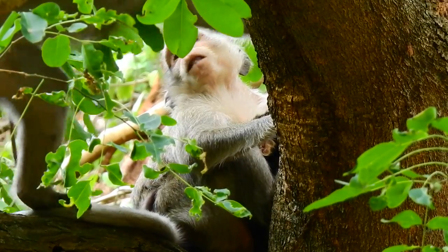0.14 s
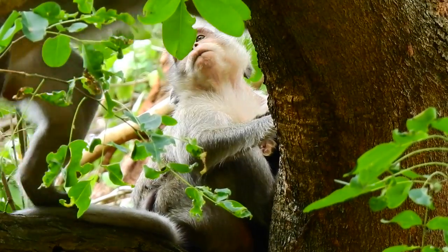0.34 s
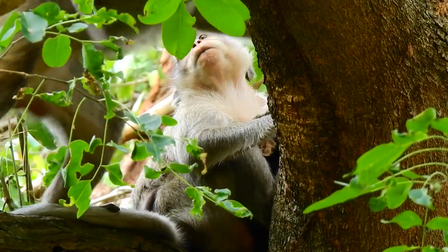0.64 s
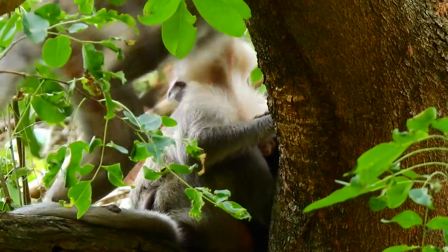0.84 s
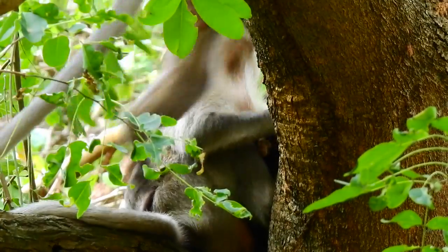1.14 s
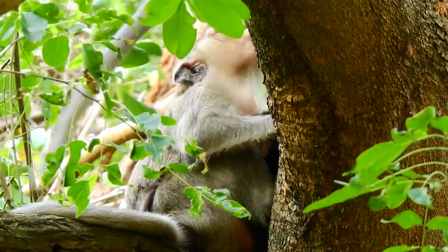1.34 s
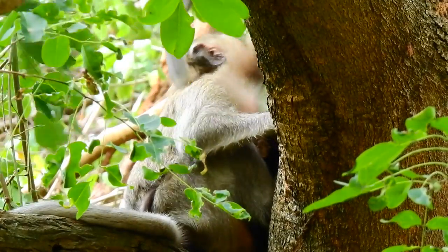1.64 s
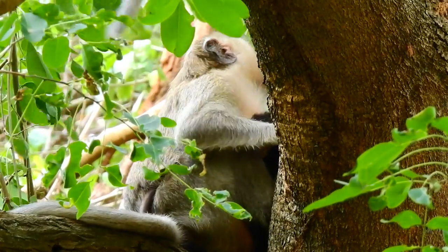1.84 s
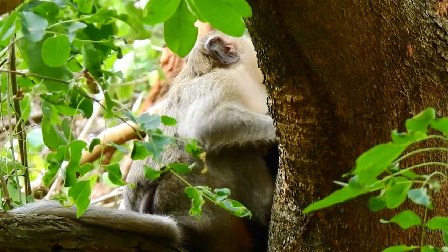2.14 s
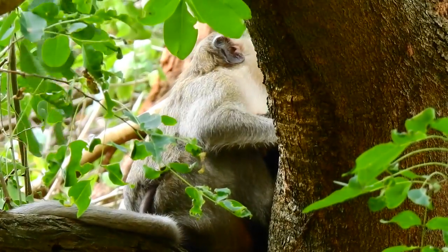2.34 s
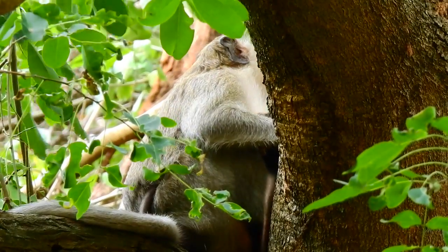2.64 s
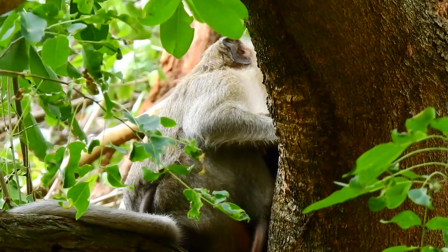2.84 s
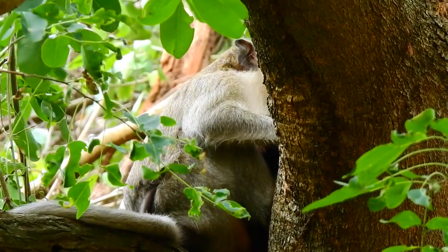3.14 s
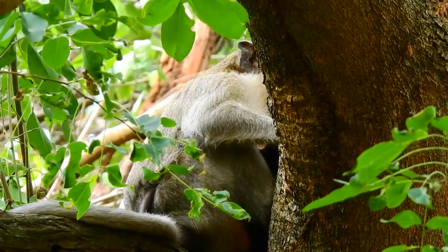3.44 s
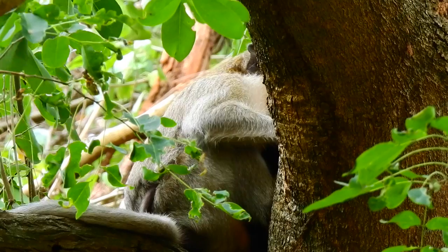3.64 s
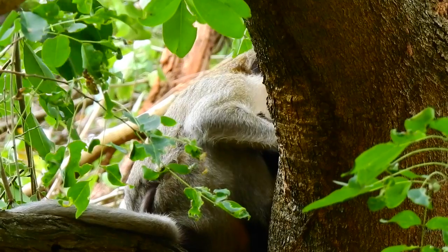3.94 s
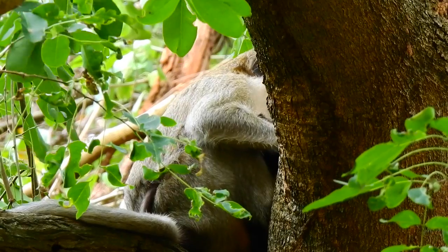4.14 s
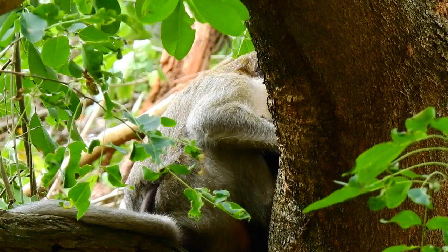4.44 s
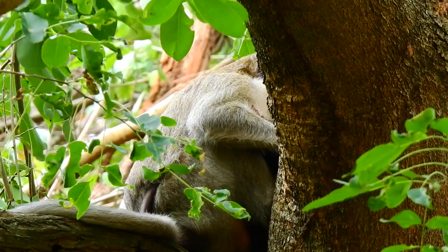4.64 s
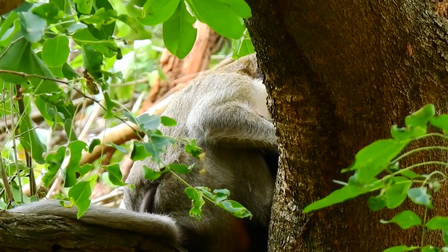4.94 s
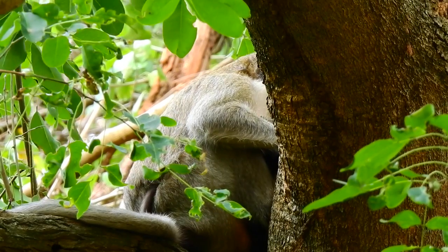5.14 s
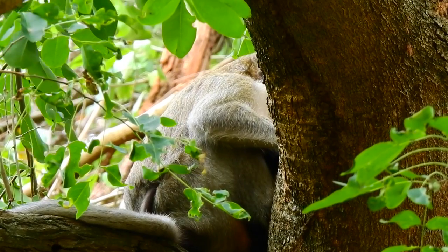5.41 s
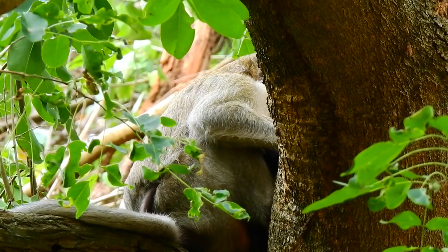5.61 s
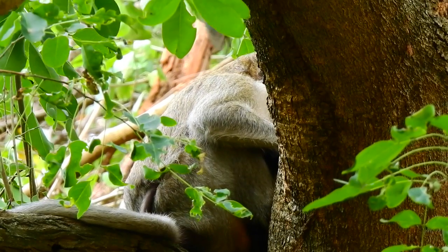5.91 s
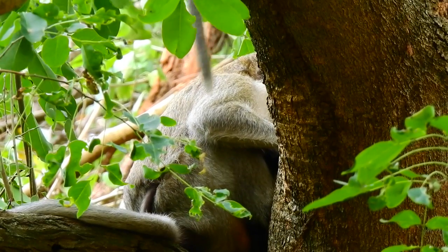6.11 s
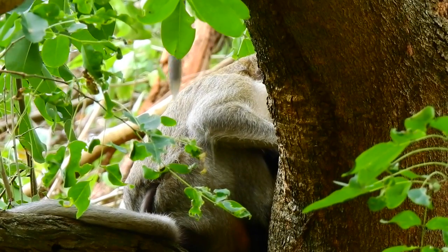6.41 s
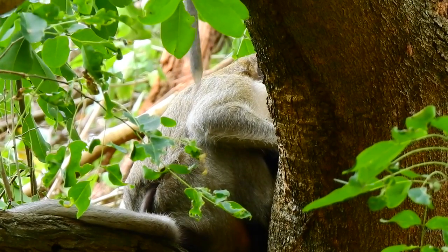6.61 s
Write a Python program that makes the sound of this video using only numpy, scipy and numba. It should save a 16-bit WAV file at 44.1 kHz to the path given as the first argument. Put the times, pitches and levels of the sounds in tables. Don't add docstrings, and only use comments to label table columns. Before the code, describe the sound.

A tropical forest heard in stereo, close to the foliage. At 0 s a distant cicada group drones at high pitch, a rapid clicking blurred into a buzz around 5 to 7 kHz. From about 0.5 to 1.3 s a nearer, shriller group swells over it and holds, slightly wavering, until about 6.4 s, then fades quickly, leaving the far drone bare by 6.7 s. Underneath are soft low breeze, thin hiss and a very faint far engine idling. Leaves brush brightly near 0.9 s, flick at 1.8, swish at 3.4 to 3.6 and most strongly at 4.05 s. Dry twig ticks come at 0.3, 1.75, 2.65, 3.5, 4.3, 4.5 and 4.8 s. Distant birds give faint level calls early, a falling whistle at 1.1 s, short notes at 2.6 and 3.4 s, a lower gliding cluster around 4.6 to 5.1 s and weak notes near 6.6 s, lightly echoing off trunks.

```python
import sys
import numpy as np
from scipy import signal
from scipy.fft import rfft, irfft, next_fast_len
from scipy.io import wavfile
from scipy.ndimage import uniform_filter1d
from numba import njit

SR = 44100
rng = np.random.default_rng(int(sys.argv[2]) if len(sys.argv) > 2 else 0)


def to_wav(sig):
    pcm = np.clip(np.atleast_2d(sig), -1, 1) * 32767
    pcm = np.round(pcm).astype(np.int16)
    wavfile.write(sys.argv[1], SR, pcm.T)


def decibels_to_gain(level_db):
    exponent = np.asarray(level_db, float) / 20
    return 10 ** exponent


N = 298557
TIME = np.arange(N) / SR
SIZE = next_fast_len(N + SR)
FREQ = np.maximum(np.arange(SIZE // 2 + 1) * SR / SIZE, 1)

# f/Hz, level/dB [dB per Hz]
AIR_SPECTRUM = [(13, -72), (22, -45), (49, -7.5), (119, -1.5), (258, -19), (308, -18.5), (501, -20.5),
                (654, -16), (747, -23.5), (1040, -20), (1660, -23), (1940, -21), (2210, -23), (2580, -22),
                (4400, -18), (5720, -50), (9680, -120)]
# f/Hz, level/dB [dB per Hz]
HISS_SPECTRUM = [(8600, -11), (9300, -2.5), (10000, -3), (11000, -3.5), (13000, -9), (16600, -15)]
# t/s, level/dB
GUSTS = [(0, -59.5), (.66, -62.5), (1.1, -64), (2.13, -59), (2.9, -61.5), (3.8, -61.5), (4.45, -59),
         (4.9, -62.5), (5.5, -63.5), (6.45, -64.5), (6.77, -61.5)]
# t/s, f/Hz, level/dB
ENGINE_FIRING = [
    (0, 24.34, -10),
    (.6, 23.71, 0),
    (1.3, 23, -4),
    (2.2, 23, -2),
    (3, 22.41, 1),
    (4, 22.42, -2),
    (5, 22.5, 0.5),
    (6, 22.19, 1.5),
    (6.77, 21.52, 2.5),
]
# multiple of the firing rate [1], level/dB
EXHAUST_ORDERS = [(2, -26), (3, -3.5), (4, -5), (5, -2.5), (6, -2.5), (7, -7.5), (8, -15.5), (9, -15)]
# t/s, length/s, start f/Hz, end f/Hz, level/dB
BIRD_GLIDES = [(1.08, .098, 4750, 4100, -54), (1.17, .06, 4200, 4050, -59), (1.1, 0.06, 2300, 2314, -66.5),
               (2.59, .09, 3800, 3820, -55), (2.597, .08, 3350, 3330, -64), (3.221, 0.11, 3320, 3420, -63),
               (3.24, .06, 2500, 2340, -65), (3.399, 0.056, 2580, 2800, -55.5),
               (3.456, .07, 3250, 3206, -59.5), (3.531, 0.113, 3100, 3340, -57),
               (4.599, 0.087, 2170, 2335, -64), (4.614, .05, 1790, 1740, -65), (4.68, .04, 2300, 2160, -64),
               (4.72, .12, 2089, 2040, -54.5), (4.755, .085, 1910, 1430, -53),
               (4.79, .09, 1950, 1622, -58.5), (4.857, .06, 1500, 1370, -65), (4.921, .05, 1360, 1660, -61),
               (4.97, .03, 1850, 1850, -65), (5.078, 0.057, 2042, 2040, -62),
               (6.547, 0.17, 1957, 1950, -70), (6.733, .05, 2180, 2190, -64)]
# t/s, length/s, f/Hz, level/dB
BIRD_HOOTS = [(0, 0.6, 3390, -68), (.63, .3, 3390, -68), (0.819, .25, 3815, -58.5), (1.26, .16, 3815, -61),
              (1.2, .35, 3400, -72), (1.199, .3, 1080, -70), (1.72, .17, 324, -66),
              (2.15, 0.32, 169.4, -59.5), (2.95, .2, 1714, -71), (2.857, 0.047, 168, -48),
              (3.001, 0.46, 643.6, -68.5), (3.951, .5, 640, -73), (5.401, .157, 385.3, -67),
              (5.804, 0.37, 644, -69.5), (6.102, .62, 1056, -72)]
# t/s, peak level/dB, ring f/Hz, ring time/s
TWIG_TICKS = [(.321, -48, 2600, .02), (.677, -53, 497, .022), (1.737, -41, 4000, .015),
              (1.777, -43, 3750, .04), (1.785, -41, 4300, .04), (2.33, -53, 1206, .03),
              (2.648, -45, 440, .028), (2.652, -46, 3800, .02), (3.498, -42, 3500, .015),
              (3.871, -55, 300, .03), (4.008, -62, 10530, .01), (4.261, -44, 3210, 0.022),
              (4.483, -44, 3700, .015), (4.762, -42.5, 3670, .04), (5.4505, -60, 12500, .0062)]
# loudest t/s, length/s, level/dB, brightness/dB, lowest f/Hz (leaf size)
LEAF_BRUSHES = [
    (.92, 0.14, -61, -16, 2000),
    (1.777, 0.079, -57, -24, 2400),
    (3.36, .28, -61, -27, 1800),
    (3.573, 0.16, -55, -17, 1290),
    (4.045, .095, -49, -17.5, 450),
    (5.46, .05, -74, -2, 3500),
]
# t/s, far group level/dB, near group level/dB
CHORUS_LEVELS = [(0, -42, -62), (.5, -42.5, -59), (.8, -43.5, -53.5), (1.3, -45.5, -51), (2.1, -47, -49),
                 (4, -46.5, -50), (5, -49, -49.5), (6.2, -48.5, -50.5), (6.47, -47.5, -52),
                 (6.64, -44, -62), (6.77, -46, -65)]
# f/Hz, level/dB [dB per Hz]
FAR_RADIATION = [(3000, -38), (3800, -46), (4720, -15.5), (4920, -6), (5150, -3.5), (5690, -9.5), (6030, 1),
                 (6380, 1), (7260, -4.5), (7680, -7.5), (8100, -32), (8800, -32), (9600, -30.5),
                 (10500, -48)]
# f/Hz, level/dB [dB per Hz]
NEAR_RADIATION = [(3900, -36), (4730, -12.5), (5500, -14), (5750, -2), (6030, -1.5), (6600, -16),
                  (6940, -0.5), (7400, -1), (7800, -4.5), (8600, -10), (8780, -24.5), (9300, -23.5),
                  (9900, -28), (10600, -39)]
# f/Hz, level/dB
STEADY_PARTIALS = [(5190, -57), (5529, -59.5), (5879, -49), (6035, -61.5), (6072, -49.5), (6099, -52.5),
                   (6250, -53), (6379, -54.5), (6713, -60), (6848, -52), (6928, -49), (7084, -69),
                   (7144, -48.5), (7298, -51.5), (7424, -57), (7515, -75), (7854, -71), (7946, -74),
                   (8000, -60), (8177, -83), (8323, -68), (8479, -71)]


def unit(x):
    return x / np.sqrt(np.mean(x ** 2))


def curves(table):
    s, *columns = np.transpose(table)
    return [np.interp(TIME, s, column) for column in columns]


def colour(points):
    hz, db = np.transpose(points)
    return decibels_to_gain(np.interp(np.log(FREQ), np.log(hz), db, left=-200, right=-200))


def shaped(x, gain):
    return irfft(rfft(x, SIZE) * gain, SIZE)[..., :N]


def walk(rate):
    hold = int(SR / rate)
    levels = np.repeat(rng.standard_normal(N // hold + 1), hold)
    return 1.3 * uniform_filter1d(uniform_filter1d(levels, hold), hold)[:N]


def pair(alike):
    mid, side = rng.standard_normal((2, N))
    alike = np.clip(alike, 0, 1)
    opposed = side * np.array([[1], [-1]])
    return np.sqrt((1 + alike) / 2) * mid + np.sqrt((1 - alike) / 2) * opposed


@njit
def resonance(x, hz, width):
    y, band, low = np.empty(len(x)), 0., 0.
    for i in range(len(x)):
        g = np.tan(np.pi * hz[i] / SR)
        damping = width / hz[i]
        v = (band + g * (x[i] - low)) / (1 + g * (g + damping))
        band, low = 2 * v - band, low + 2 * g * v
        y[i] = damping * v
    return y


def forest(x, common, t60, lead):
    t = TIME[:SR // 2]
    tail = rng.standard_normal((3, len(t))) * decibels_to_gain(-60 * t / t60)
    paths = rfft(tail / np.sqrt(np.sum(tail[0] ** 2)), SIZE)
    common = np.clip(common, 0, 1)
    delay = np.exp(-1j * np.pi * FREQ / SR * lead * np.array([[-1], [1]]))
    return rfft(x, SIZE) * (np.sqrt(common) * paths[0] * delay + np.sqrt(1 - common) * paths[1:])


def patches(shape, db, seconds, hz, step):
    field = rng.standard_normal(shape)
    for axis, cells in enumerate((hz / step[0], seconds / step[1])):
        window = np.expand_dims(np.hanning(int(2 * cells) + 3), 1 - axis)
        field = signal.fftconvolve(field, window, "same")
    return decibels_to_gain(db * unit(field))


def breeze():
    leaf_db, = curves(GUSTS)
    low = 1 / (1 + (FREQ / 215) ** 8)
    air = colour(AIR_SPECTRUM)
    rumble = shaped(pair(0.95), air * low ** .5) * decibels_to_gain(1.3 * walk(2.99))
    leaves = shaped(pair(0.77), air * (1 - low) ** .5) * decibels_to_gain(leaf_db - leaf_db.mean())
    hz, s, cells = signal.stft(leaves, SR, nperseg=2048, noverlap=1536)
    step = (hz[1], s[1])
    broad = patches(cells.shape[1:], 1.5, .12, 300, step)
    flecks = patches(cells.shape[1:], 3.6, 0.067, 30, step)
    cells *= broad * flecks
    wind = rumble + signal.istft(cells, SR, nperseg=2048, noverlap=1536)[1][:, :N]
    hiss = unit(shaped(pair(0.046), colour(HISS_SPECTRUM)))
    return unit(wind) * decibels_to_gain(-55.0) + hiss * decibels_to_gain(-73 + .7 * walk(10))


def engine():
    hz, db = curves(ENGINE_FIRING)
    phase = 2 * np.pi * np.cumsum(hz) / SR
    throb = 0
    for order, order_db in EXHAUST_ORDERS:
        level = decibels_to_gain(order_db + db - 61.0 + 1.8 * walk(2.9))
        throb = throb + level * np.cos(order * phase - 0.1475 * order * order)
    return throb


def birds():
    dry, wet = np.zeros((2, N))
    waver = .015 * walk(70)
    level_calls = [(s, length, hz, hz, db) for s, length, hz, db in BIRD_HOOTS]
    for s, length, hz0, hz1, db in list(BIRD_GLIDES) + level_calls:
        at = slice(max(int(s * SR), 0), int((s + length) * SR))
        u = np.clip((TIME[at] - s) / length, 0, 1)
        glide = hz1 + (hz0 - hz1) * (1 - u) ** 1.8
        roughness = hz1 / 8 + 5.5 * abs(hz1 - hz0)
        hz = glide + roughness * waver[at]
        swell = np.sin(np.pi * u ** 0.58) ** .5
        note = decibels_to_gain(db) * swell * np.sin(2 * np.pi * np.cumsum(hz) / SR)
        echo = np.clip(.35 * min(hz1 / 1500, 1), 0, 1)
        dry[at] += note * np.sqrt(1 - echo)
        wet[at] += note * np.sqrt(echo)
    echoes = irfft(forest(wet, .75, 0.32, 0), SIZE)[:, :N]
    return dry * decibels_to_gain(3.1 * walk(60)) + echoes * decibels_to_gain(3.5)


def twigs():
    t = TIME[:4000]
    out = np.zeros((2, N + len(t)))
    for s, db, hz, t60 in TWIG_TICKS:
        width_hz = 250 + .3 * hz
        centre = np.full(len(t), 1. * hz)
        burst = rng.standard_normal(len(t)) * decibels_to_gain(-60 * t / t60)
        ring = resonance(resonance(burst, centre, 1. * width_hz), centre, 0.48 * width_hz)
        start = int(s * SR)
        out[:, start:start + len(t)] += ring / np.abs(ring).max() * decibels_to_gain(db)
    return out[:, :N]


def swish():
    out = np.zeros((2, N))
    grains = pair(.75) * decibels_to_gain(2.5 * rng.exponential(size=N) + 1.5 * walk(150))
    wide = colour([(300, -20), (1000, -2.5), (2500, -3.0), (4000, -2.5), (5200, 5), (8000, -13), (9500, -29)])
    top_gain = colour([(8000, -4.5), (9000, 6.5), (11000, -2), (14000, -18), (16500, -25)])
    top = unit(shaped(grains, top_gain))
    for s, length, db, bright_db, bottom_hz in LEAF_BRUSHES:
        u = (TIME - s) / length
        loss_db = 9 * np.where(u > 0, u, (u / .4) ** 2)
        level = decibels_to_gain(db - loss_db)
        body = unit(shaped(grains, wide / (1 + (bottom_hz / FREQ) ** 4)))
        out += level * body * decibels_to_gain(7.5) + level * decibels_to_gain(bright_db) * top * decibels_to_gain(8.5)
    return out


def group(db, body, rate_hz, jitter, lead, common, count):
    total = 0
    for _ in range(count):
        mean_period = SR / (rate_hz * rng.uniform(.8, 1.25))
        period = mean_period * (1 + jitter * rng.standard_normal(N // 60))
        at = np.cumsum(period).astype(int)
        strength = decibels_to_gain(2.85 * rng.standard_normal(len(at)))
        clicks = np.bincount(at[at < N], strength[at < N], N)
        song = unit(clicks) * decibels_to_gain(db + 0.57 * walk(1.62))
        total = total + forest(song, common, 0.36, lead * rng.uniform(0.62, 1.38))
    gain = colour(body)
    heard = irfft(total * gain, SIZE) / np.sqrt(count * np.mean(gain ** 2))
    heard[:, :SR // 2] += heard[:, N:N + SR // 2]
    return heard[:, :N]


def steady_singers(near_db):
    lines = 0
    for hz, db in STEADY_PARTIALS:
        ring = shaped(pair(.4), 1 / (1 + ((FREQ - hz) / 9) ** 2))
        lines = lines + unit(ring) * decibels_to_gain(db + 2.4 * walk(1.1))
    return lines * decibels_to_gain(.5 * (near_db - near_db.max()) - 0.5)


def cicadas():
    far_db, near_db = curves(CHORUS_LEVELS)
    high_hz = 7000 + 30 * TIME
    low_hz = 6010 + 22 * (-53 - near_db)
    far = group(far_db + 5.5, FAR_RADIATION, rate_hz=260, jitter=.06, lead=0.54, common=0.47, count=4)
    near = group(near_db + 9.5, NEAR_RADIATION, rate_hz=300, jitter=.06, lead=1.48, common=0.7, count=4)
    near = np.array([x + 0.92 * resonance(x, high_hz, 300.) + 0.26 * resonance(x, low_hz, 270.0)
                     for x in near])
    return far + near + steady_singers(near_db)


def scene():
    return breeze() + engine() + birds() + twigs() + swish() + cicadas()


def roll_off(x):
    return signal.sosfilt(signal.butter(12, 16516, fs=SR, output="sos"), x)


def record(dry):
    tilt = decibels_to_gain(np.array([[-.35], [.35]]) * np.minimum(FREQ / 3000, 1))
    return roll_off(shaped(dry, tilt))


dry = scene()
out = record(dry)
to_wav(out)
```